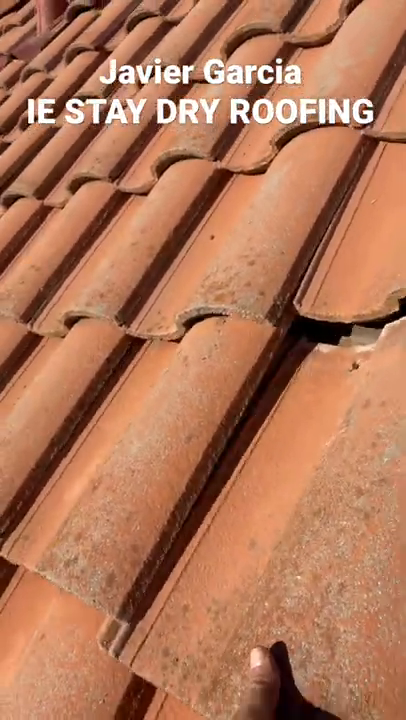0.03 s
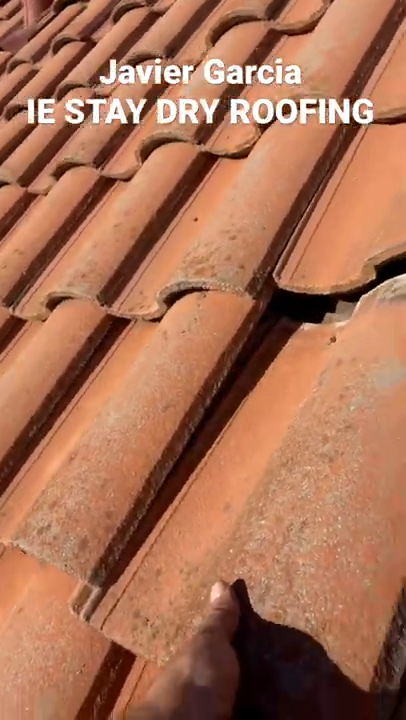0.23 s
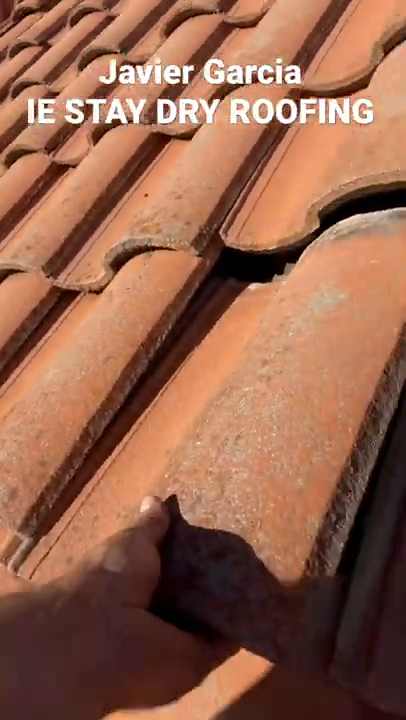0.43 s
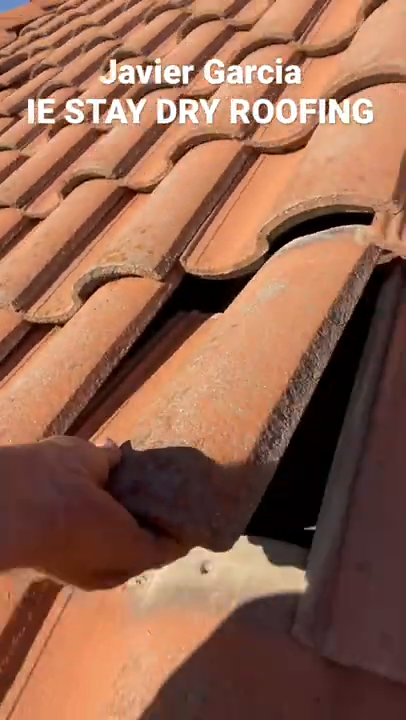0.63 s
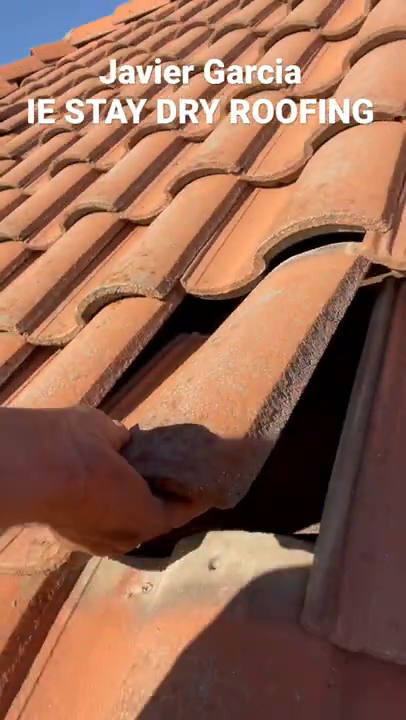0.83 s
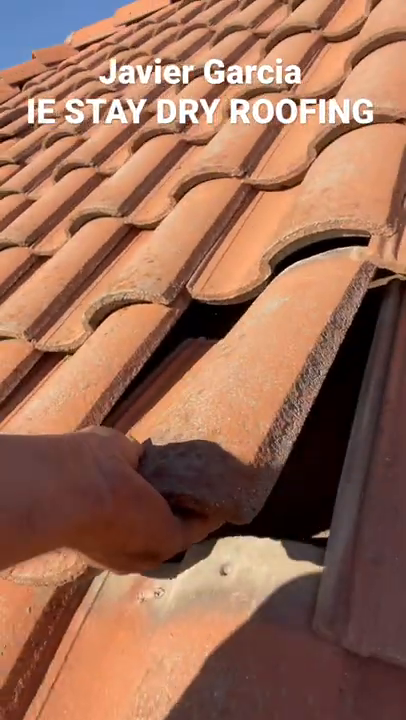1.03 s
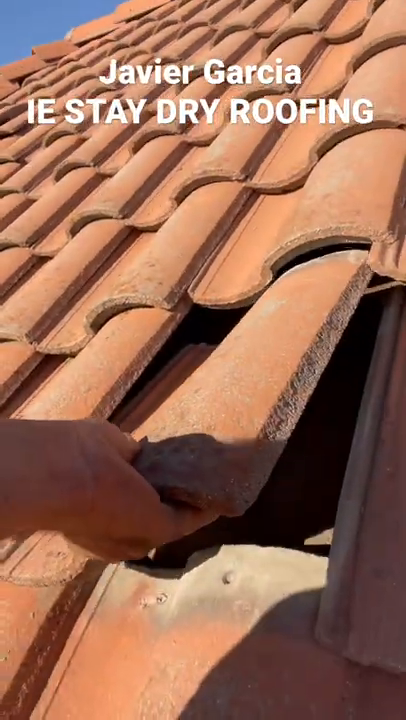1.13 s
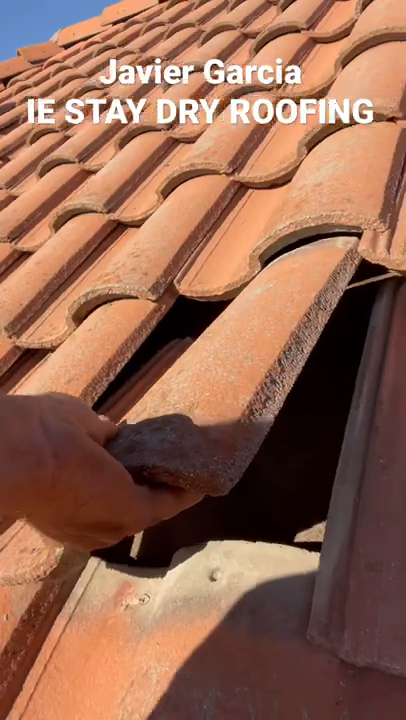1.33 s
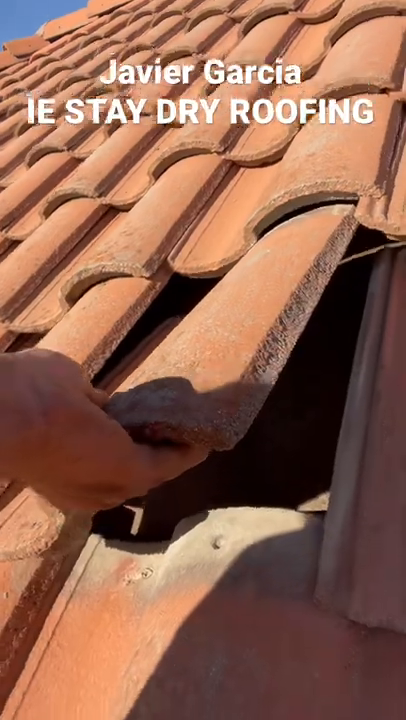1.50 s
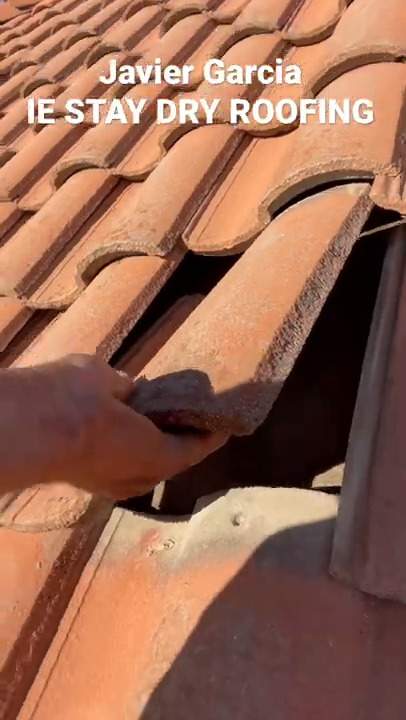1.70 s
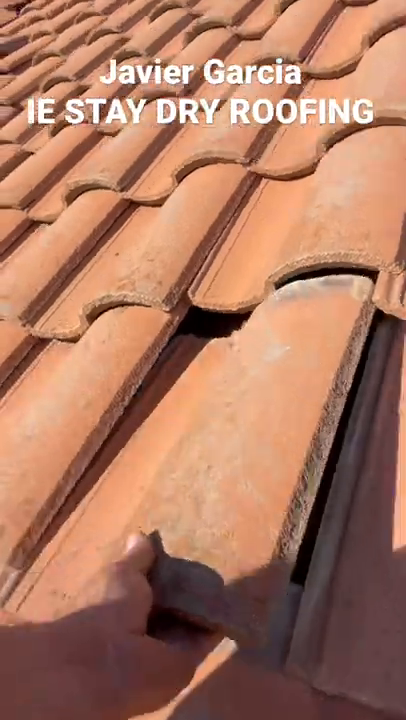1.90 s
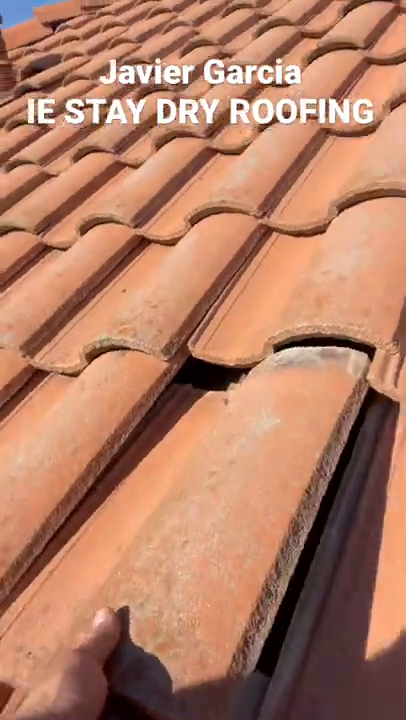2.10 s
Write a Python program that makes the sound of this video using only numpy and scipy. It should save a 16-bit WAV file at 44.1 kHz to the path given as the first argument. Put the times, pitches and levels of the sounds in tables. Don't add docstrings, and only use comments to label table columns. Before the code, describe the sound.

A clay roof tile knocks and grinds against its neighbours as wind buffets the microphone outdoors

```python
import sys
import numpy as np
from scipy import signal
from scipy.fft import rfft, irfft, next_fast_len
from scipy.io import wavfile
from scipy.ndimage import uniform_filter1d, map_coordinates

SR = 44100
rng = np.random.default_rng(int(sys.argv[2]) if len(sys.argv) > 2 else 0)


def store_wav(level_fs):
    pcm = np.round(np.clip(np.atleast_2d(level_fs), -1, 1) * 32767)
    wavfile.write(sys.argv[1], SR, pcm.T.astype(np.int16))


def nominal_scale(level):
    x = np.asarray(level, float) / 20
    return 10 ** x


N = 94903

# frequency in Hz, level in dB, t60 in seconds.
CLAY_MODES = [(460.5, 9.5, 0.056), (688, -11, 0.0057), (872, -12.5, 0.019), (1134, -14, 0.16),
              (1270, -13.5, 0.013), (1460, 3, 0.14), (1737, -8, 0.12), (1821, 4.5, 0.034),
              (2160, 1.5, 0.039), (2445, 5, 0.032), (3067, 10.5, 0.12), (3690, -3, 0.19), (3810, 6, 0.014),
              (4470, -27, 0.047)]
PORT_SIGN = np.array([[1], [-1]])


def unit(x):
    return x / np.sqrt(np.mean(x ** 2) + 1e-20)


def along(points, hz):
    f, v = np.transpose(points)
    return np.interp(np.log(hz + 1), np.log(f + 1), v)


def curve(rows):
    return np.interp(np.arange(N) / SR, *np.transpose(rows))


def wobble(knots_per_s):
    return map_coordinates(rng.standard_normal(400), [np.arange(N) * knots_per_s / SR])


def filtered(x, response):
    m = next_fast_len(N + SR // 4)
    return irfft(rfft(x, m) * response(np.fft.rfftfreq(m, 1 / SR)), m)[..., :N]


def patchy(x, patchy_db, wide, long):
    z = signal.stft(x, nperseg=256)[2]
    field = rng.standard_normal(z.shape[1:])
    field = uniform_filter1d(field, size=wide, axis=0)
    field = uniform_filter1d(field, size=long, axis=1)
    return signal.istft(z * nominal_scale(patchy_db * unit(field)), nperseg=256)[1][:, :N]


def ports(a, b):
    # frequency in Hz, phase lead of left over right in radians.
    phase_lead = [(500, -.2), (800, .4), (1800, -.3), (3960, -.1), (4500, -1.6), (4950, -np.pi),
                  (5600, -4.2), (7300, -4.5), (10000, -5.2), (11800, -6.1)]
    # frequency in Hz, likeness of the ports from 0 to 1.
    likeness = [(60, .87), (300, .86), (900, .9), (2900, .5), (3900, .85), (4400, .6), (4900, .98),
                (5400, .9), (10000, .85), (12000, .975)]

    def turn(hz):
        return np.arccos(np.clip(along(likeness, hz), -1, 1)) / 2

    def lead(hz):
        return np.exp(0.5j * along(phase_lead, hz) * PORT_SIGN)

    common = filtered(a, lambda hz: lead(hz) * np.cos(turn(hz)))
    opposed = filtered(b, lambda hz: lead(hz) * np.sin(turn(hz)) * PORT_SIGN)
    return common + opposed


def rush(spectrum):
    points = [(11, -100), *spectrum, (18000, -120)]
    noise = filtered(rng.standard_normal((2, N)), lambda hz: nominal_scale(along(points, hz)))
    return unit(ports(*noise))


def modes(hz, weight_db):
    total = 0
    for k, ((c, db, t60), extra_db) in enumerate(zip(CLAY_MODES, weight_db)):
        resonance = 1j * hz * (1.67 / t60) / (c * c - hz * hz + 1j * hz * 1.45 / t60)
        total = total + (-1) ** k * nominal_scale(db + extra_db) * resonance
    return total


def wind():
    # time in seconds, buffeting level in dB.
    gust_rows = [(0, -21), (.06, -15.5), (.13, -22.5), (.2, -33), (.28, -20.5), (.385, -23), (.52, -34.5),
                 (.62, -33), (.68, -26), (.78, -33.5), (.88, -28.5), (1.06, -44.5), (1.2, -30.5),
                 (1.4, -45), (1.51, -34.5), (1.77, -37), (1.9, -16.5), (2.02, -34.5)]
    # time in seconds, roof hiss level in dB.
    sweep_rows = [(.16, -51.5), (.3, -44.5), (.44, -44), (.51, -51.5), (.78, -53), (.87, -42), (.93, -52.5),
                  (1.1, -51), (1.2, -35.5), (1.29, -42), (1.36, -57), (1.44, -53.5), (1.55, -37.5),
                  (1.78, -38), (1.98, -40), (2.05, -46), (2.15, -67)]
    # frequency in Hz, density in dB per Hz.
    rumble_spectrum = [(25, -49), (46, -1.5), (80, 6), (113, -2), (190, -6), (370, -16), (700, -35.5),
                       (1300, -39.5)]
    hiss_spectrum = [(700, -15), (1360, -11), (1570, -6.5), (2190, -7), (2500, -7), (3060, -6.5),
                     (4300, -13), (5600, -18.5)]
    street_spectrum = [(300, -19), (1000, -11), (3000, -24), (5000, -3), (11000, -14.5), (13000, -77)]
    lumps_db, flutter_db, street_db = 2.5, 3, -59.5

    flutter = np.array([wobble(60.4), wobble(72)])
    lumps = nominal_scale(lumps_db * wobble(29.77) + flutter_db * flutter)
    hiss = unit(patchy(rush(hiss_spectrum), patchy_db=2.5, wide=2, long=14))
    hiss = nominal_scale(curve(sweep_rows) + 0.3 * wobble(14.1)) * hiss
    buffeting = nominal_scale(curve(gust_rows) + 0.5) * unit(lumps * rush(rumble_spectrum))
    return buffeting + hiss + nominal_scale(street_db) * rush(street_spectrum)


def scrape():
    # start in seconds, rise in seconds, hold in seconds, level in dB, added treble in dB.
    strokes = [(0, 0.028, 0.03, -32, 5.5), (0.063, 0.0056, 0.042, -26.5, 3.5),
               (.117, 0.007, 0.0045, -20.5, 3.5), (0.526, 0.014, 0.079, -34.5, 7),
               (0.629, 0.018, 0.03, -35.5, 6), (0.681, 0.0061, 0.038, -41.5, 5),
               (0.763, 0.0044, 0.022, -38, 4.5), (0.791, 0.0049, 0.012, -33.5, 8.5),
               (0.908, 0.00083, 0.0024, -29, 18), (0.955, 0.0086, 0.018, -40.5, 7.5),
               (1.005, 0.0012, 0.025, -35.5, 9), (1.095, 0.012, 0.1, -37, 4.5),
               (1.152, 0.0017, 0.022, -34, 9), (1.208, 0.01, 0.049, -41.5, 3),
               (1.345, 0.0022, 0.0041, -43.5, 11.5), (1.374, 0.035, 0.037, -52.5, 10),
               (1.47, 0.0024, 0.02, -46.5, 8), (1.513, 0.0035, 0.052, -54, 16),
               (1.576, 0.011, 0.027, -40.5, 7.5), (1.617, 0.087, 0.13, -45, 9.5),
               (1.777, 0.044, 0.13, -28.5, 1.5), (1.979, 0.0034, 0.029, -41, 13),
               (2.017, 0.011, 0.048, -50.5, 7.5), (2.065, 0.032, 0.023, -37.5, 2.5),
               (2.118, 0.032, .03, -25, 1.5)]
    # frequency in Hz, density in dB per Hz.
    grind_spectrum = [(400, -4.5), (1610, -4.5), (3620, -11.5), (4500, -15), (5550, -15), (9330, -18.5),
                      (11200, -25.5), (12000, -35.5)]
    # frequency in Hz, width in Hz, level in dB.
    rim_modes = [(6630, 110, -9.5), (7630, 85, -10)]
    release_s, grit_per_s, grit_db, grit_share = 0.05, 4000, 3, 0.39
    ring_share_db, treble_hz = -10, 5130

    t = np.arange(N) / SR
    catches = rng.random((2, N)) < grit_per_s / SR
    catch_gain = nominal_scale(grit_db * np.minimum(rng.exponential(size=N), 2))
    grit = catches * catch_gain * rng.standard_normal((2, N))
    rub = grit_share * unit(grit) + (1 - grit_share) * rng.standard_normal((2, N))
    rub = patchy(rub * nominal_scale(1.64 * wobble(150)), patchy_db=3, wide=2, long=6)

    body, treble = np.zeros(N), np.zeros(N)
    for s, rise, hold, db, treble_db in strokes:
        since_hold = np.clip(t - s - rise - hold, 0, None)
        shape = np.clip((t - s) / rise, 0, 1) * nominal_scale(db - 60 * since_hold / release_s)
        body += shape
        treble += shape * nominal_scale(treble_db)

    def colour(hz):
        return nominal_scale(along([(150, -47), *grind_spectrum, (15400, -46), (16500, -94)], hz))

    def below_treble(hz):
        return 1 / (1 + (hz / treble_hz) ** 8)

    def tile_ring(hz):
        return 1 + nominal_scale(ring_share_db) * 2 * modes(hz, np.zeros(len(CLAY_MODES)))

    def rim(hz):
        return 0.78 + sum(nominal_scale(db) * 1j * hz * w / (c * c - hz * hz + 1j * hz * w) for c, w, db in rim_modes)

    rub_rms = np.sqrt(np.mean(filtered(rub, colour) ** 2))
    low = filtered(rub * body, lambda hz: colour(hz) * below_treble(hz) * tile_ring(hz))
    high = filtered(rub * treble, lambda hz: colour(hz) * (1 - below_treble(hz)) * rim(hz))
    return ports(*(low + high)) / rub_rms


def eddies():
    # start in seconds, peak level in dB, pitch in Hz
    eddy_rows = [(0.046, -24, 202), (0.055, -3.5, 95), (0.069, -19, 119), (.095, -12.5, 106),
                 (0.267, -7, 265), (0.273, -5, 117), (0.306, -5.5, 270), (0.323, -10.5, 390),
                 (0.338, -10, 198), (0.343, -8.5, 104), (0.364, -9, 87), (0.461, -21.5, 238),
                 (0.649, -12, 337), (.67, -12.5, 199), (0.706, -17, 266), (0.741, -21.5, 233),
                 (0.843, -19.5, 307), (0.879, -21, 204), (1.165, -14.5, 299), (1.176, -11, 199),
                 (1.2, -16.5, 118), (1.49, -20, 154), (1.815, -5.5, 340), (1.825, -8, 246),
                 (1.834, -13, 205), (1.8801, -2.5, 184), (1.898, -8, 139), (1.932, -16.5, 107),
                 (2.071, -22.5, 134), (2.147, -16, 275), (.012, -12.5, 87), (.16, -16.5, 106),
                 (0.192, -15, 98), (.29, -12, 110), (0.393, -21, 130), (0.419, -17, 205),
                 (.478, -19.5, 253), (0.493, -31, 122), (0.519, -38, 150), (.685, -22, 100),
                 (.72, -27, 111), (0.736, -17, 144), (.858, -19, 250), (0.886, -25, 87), (1.51, -22, 73.5),
                 (.37, -11.5, 49.4), (1.03, -27, 222), (.44, -19, 303), (1.7, -28, 252), (1.74, -27, 282),
                 (1.796, -22, 222), (1.848, -8.5, 170), (1.864, -13, 206), (1.918, -15, 198),
                 (1.947, -21, 128), (1.96, -23, 147), (1.999, -24.5, 196)]
    level_db, lean_db, rise_s = -2.5, -2, 0.0019
    life_cycles, sinks_to = 1.695, 0.41

    out, t = np.zeros((2, N + SR)), np.arange(SR // 8) / SR
    for s, db, hz in eddy_rows:
        start, lean = rng.standard_normal(2)
        life_s = life_cycles / hz
        pitch_hz = hz * (sinks_to + (1 - sinks_to) * np.exp(-t / life_s)) * 1.376
        cycles = np.cumsum(pitch_hz) / SR + start + 0.044 * lean * PORT_SIGN
        envelope = (1 - np.exp(-(t / rise_s) ** 2)) * np.exp(-(t / life_s) ** 2)
        gain = nominal_scale(db + level_db + 0.5 * PORT_SIGN * lean_db * lean)
        out[:, round(s * SR):][:, :len(t)] += gain * np.sin(2 * np.pi * cycles) * envelope
    return out[:, :N]


def knocks():
    # start in seconds, peak level in dB, centre of ringing in Hz.
    knock_rows = [(0.028, -16, 3520), (0.033, 0, 817), (0.036, -1.5, 907), (0.038, -9.5, 580),
                  (0.039, -5.5, 1810), (0.047, -9.5, 1170), (0.072, -15, 3560), (0.079, -16, 3800),
                  (0.09, -10, 3330), (0.092, -16.5, 4030), (0.111, -20.5, 2980), (0.1237, -7.5, 948),
                  (0.126, -12.5, 1710), (0.541, -28.5, 1020), (0.547, -23.5, 2100), (0.564, -15.5, 2160),
                  (0.569, -24.5, 2970), (0.568, -22, 455), (0.573, -16.5, 910), (0.58, -23, 3750),
                  (0.582, -23, 2030), (0.585, -10, 800), (0.587, -11.5, 1435), (0.597, -21, 2390),
                  (0.61, -26, 2310), (0.655, -27, 1290), (0.741, -38, 820), (0.771, -20.5, 1370),
                  (0.777, -31, 3000), (0.909, -27.5, 900), (0.964, -26.5, 1460), (1.013, -23, 1400),
                  (1.128, -31, 1270), (1.16, -16.5, 1560), (1.787, -22, 1020), (1.79, -28, 1900),
                  (1.813, -15.5, 2400), (1.814, -20, 3670), (1.834, -18, 1010), (1.865, -15, 3800),
                  (1.866, -7, 1337), (1.869, -12, 765), (1.874, -8, 1450), (1.898, -24, 990),
                  (1.918, -9, 1720), (1.924, -20, 1070), (1.958, -22.5, 1980), (1.992, -17, 2140),
                  (1.993, -19, 3900), (1.998, -14.5, 3970), (1.996, -15, 4470), (2.006, -25, 1870),
                  (2.046, -35, 1640), (2.104, -26, 2800), (2.128, -22, 970), (2.132, -18.5, 1170),
                  (2.136, -20, 3800), (2.146, -19, 4030), (2.147, -10.5, 1640), (2.148, -5, 580)]
    contact_s, first_blow = 0.001987, 3.24
    level_db, crack_db, spot_db, spot_q = -3, -6.5, 2.5, 10
    spread_oct, scatter_db = 0.35, 2
    soft = 2.2

    out, t = np.zeros((2, N + SR)), np.arange(SR // 8) / SR
    hz = np.fft.rfftfreq(len(t), 1 / SR)
    mode_hz = np.array(CLAY_MODES)[:, 0]
    for s, db, centre_hz in knock_rows:
        blow = rng.standard_normal((2, len(t))) * np.sqrt(t / contact_s) * np.exp(-t / contact_s)
        blow[0, round(contact_s * SR)] += first_blow
        weight_db = -6 * (np.log2(mode_hz / centre_hz) / spread_oct) ** 2
        weight_db = weight_db + scatter_db * rng.standard_normal(len(CLAY_MODES))
        crack = nominal_scale(crack_db) * 1j * hz * centre_hz / (centre_hz + 1j * hz) ** 2
        spot_width = 1j * hz * centre_hz / spot_q
        spot = nominal_scale(spot_db) * spot_width / (centre_hz ** 2 - hz * hz + spot_width)
        softness = 1 / (1 + 1j * hz / (soft * centre_hz)) ** 4
        ring = irfft(rfft(blow) * (modes(hz, weight_db) + crack + spot) * softness, len(t))
        out[:, round(s * SR):][:, :len(t)] += nominal_scale(db + level_db) * ring / np.abs(ring[0]).max()
    return ports(*out[:, :N])


def scene():
    # frequency in Hz, left over right in dB.
    tile_lean = [(300, -4), (860, -6.5), (1900, 1), (2700, -0.5)]
    air = wind()
    tile = scrape() + knocks()
    tile = filtered(tile, lambda hz: nominal_scale(0.5 * PORT_SIGN * along(tile_lean, hz)))
    return tile + air + eddies()


def band_limit(x):
    return signal.sosfilt(signal.butter(12, 15600, fs=SR, output="sos"), x)


def record(dry):
    limited = dry / (1 + np.abs(dry / 1.9) ** 4) ** (1 / 4)
    mix = filtered(limited, lambda hz: hz < 15700)
    return band_limit(mix)


dry = scene()
out = record(dry)
store_wav(out)
```